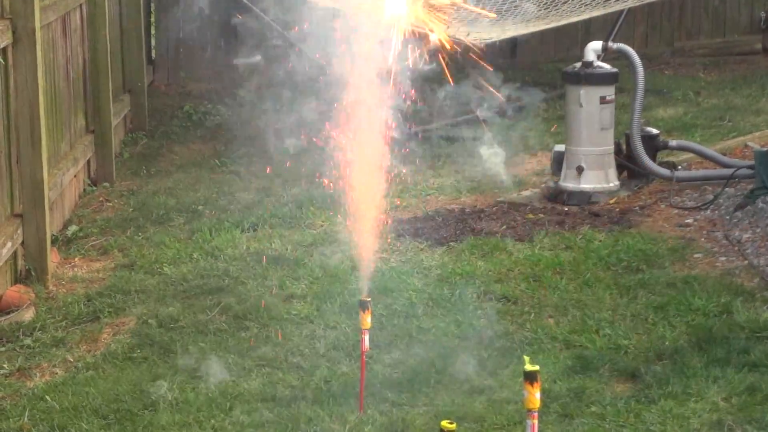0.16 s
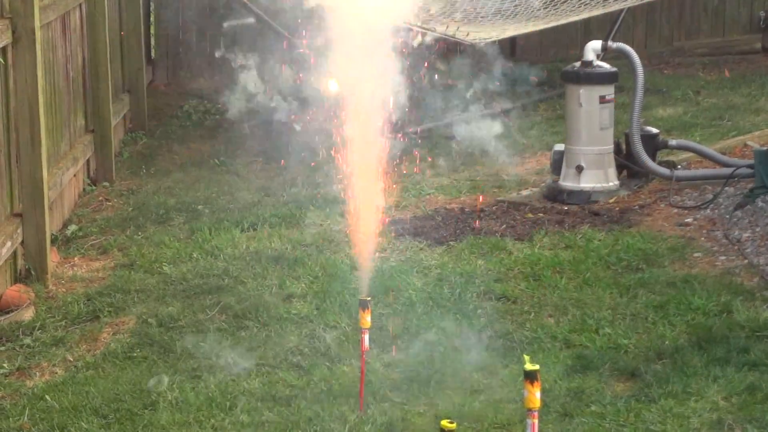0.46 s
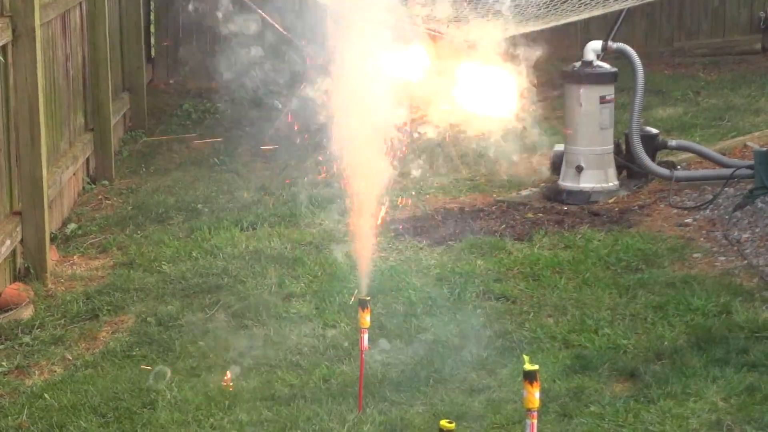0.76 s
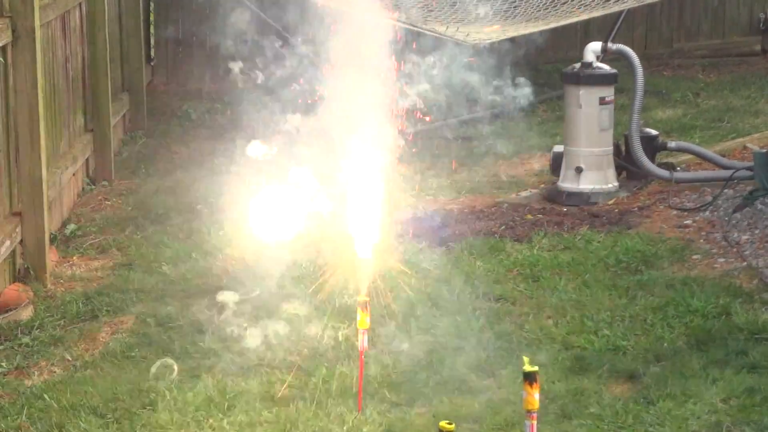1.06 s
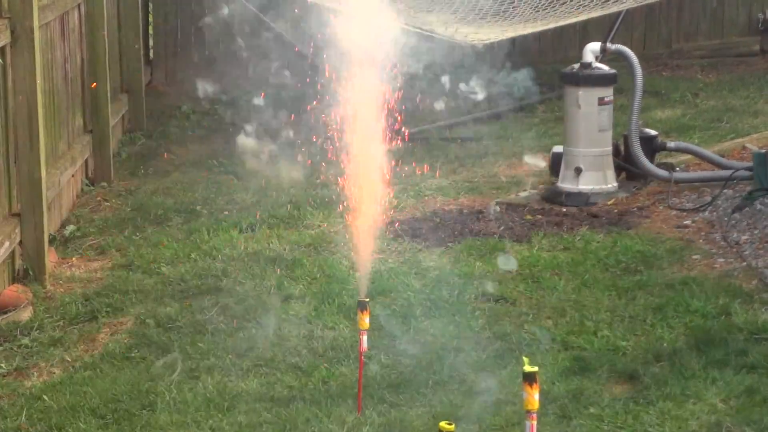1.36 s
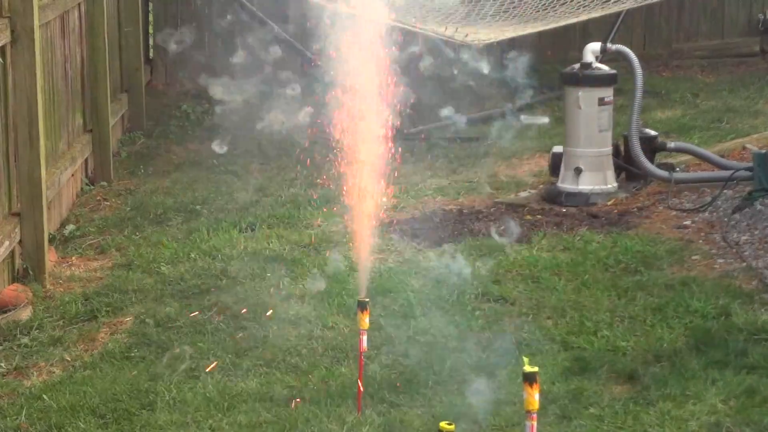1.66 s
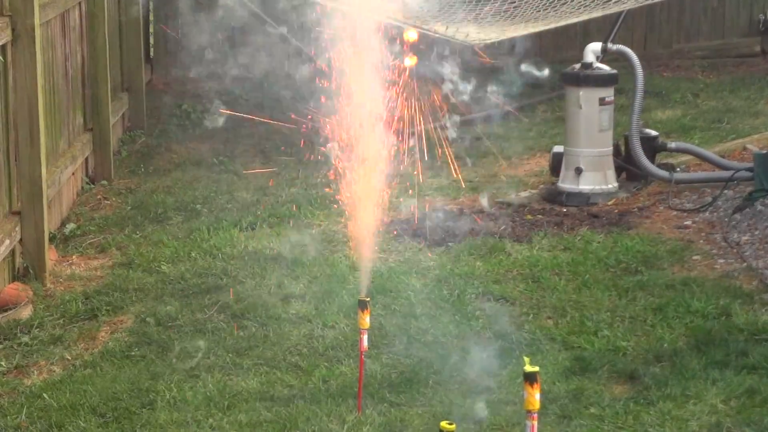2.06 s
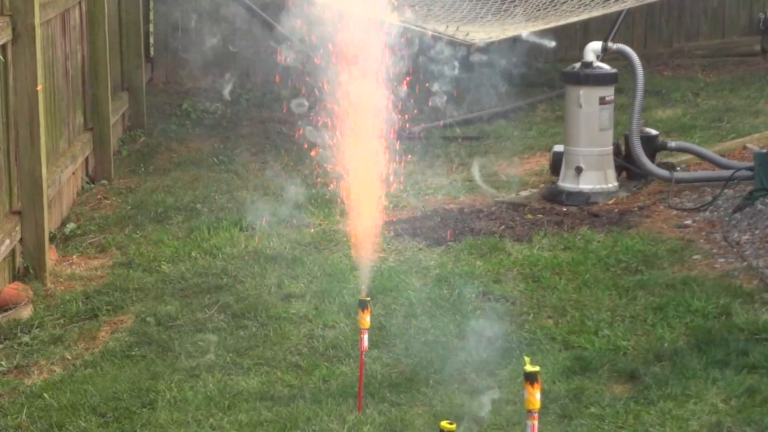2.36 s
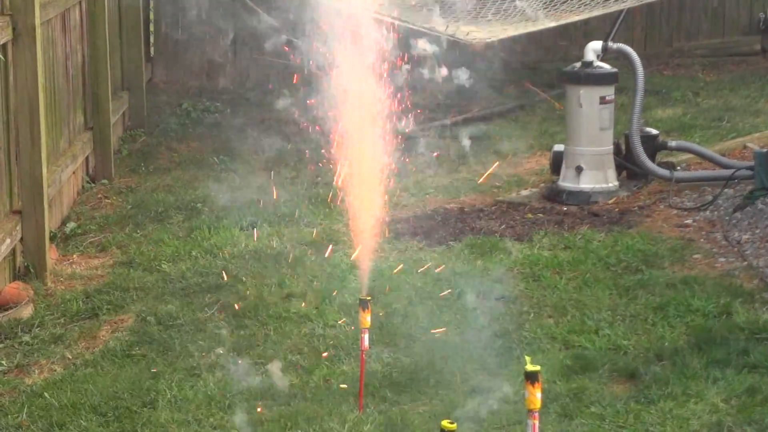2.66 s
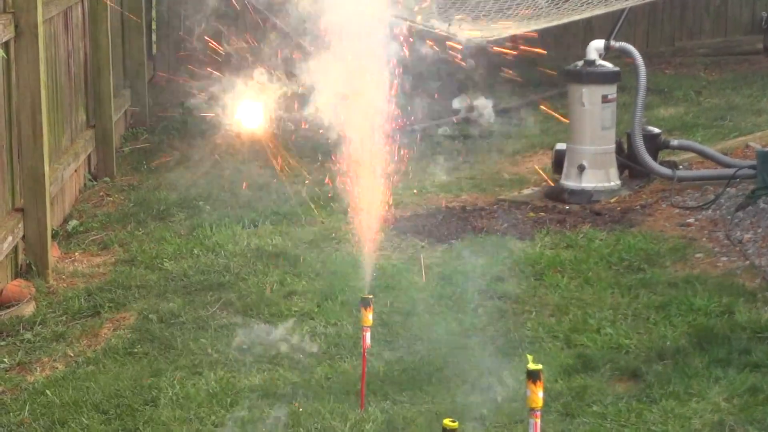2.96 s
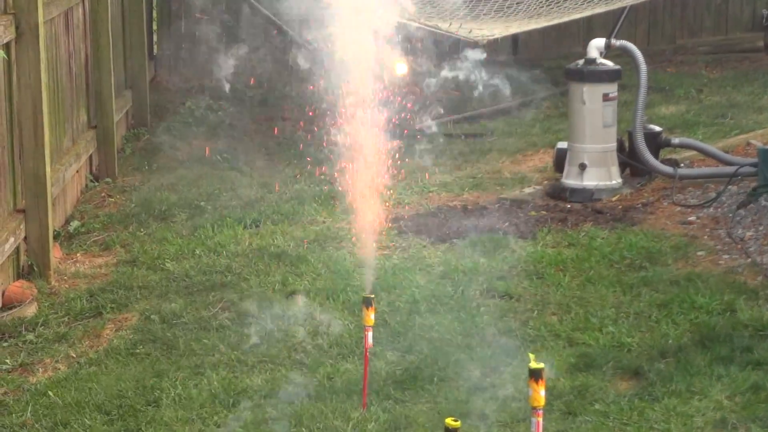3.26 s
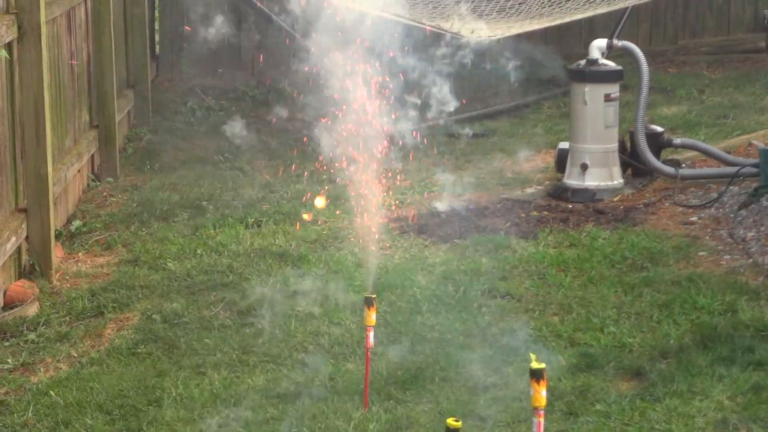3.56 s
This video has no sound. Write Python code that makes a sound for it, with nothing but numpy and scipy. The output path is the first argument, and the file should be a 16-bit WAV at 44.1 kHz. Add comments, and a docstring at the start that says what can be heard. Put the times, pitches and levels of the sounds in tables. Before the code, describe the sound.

Firework fountain already burning at full force: harsh hissing jet, hundreds of tiny snaps, louder cracks and pops scattered over it, brief dips and flares, faint low thuds; close outdoor pickup, slightly dull top and flattened peaks.

```python
"""A gas jet roars and fizzes: a ground fountain firework burns on a lawn, a few metres away.
Filtered noise makes the jet, which chokes briefly and flares again as its level curves move.
Hundreds of random spikes a second snap as sparks in the plume, with sharper cracks among them.
Now and then a larger star pops: a pressure pulse, then a short flare of noise.
Delayed copies and decaying noise echoes throw the cracks back from the ground and a wooden fence."""
import sys
import numpy as np
from scipy import signal
from scipy.io import wavfile

SR = 44100
rng = np.random.default_rng(int(sys.argv[2]) if len(sys.argv) > 2 else 0)


def store_pcm(level_fs):
    """Save levels as 16-bit WAV."""
    pcm = np.round(np.clip(level_fs, -1, 1) * 32767).astype(np.int16)
    wavfile.write(sys.argv[1], SR, np.atleast_2d(pcm).T)


N = 163170
T = np.arange(N) / SR  # seconds
EDGE_HZ = 11150  # top of the recorded band
GROUND_S, GROUND_DB = .0017, -12.5  # delay and level of the bounce off the ground
JET_WIDTH, SPARK_WIDTH = 0.24, 0.19  # side gain, for noise and for spikes


def amp(db):
    """Decibels to gain."""
    return 10 ** (np.asarray(db) / 20)


def unit(x):
    """Scales to rms 1."""
    return x / np.sqrt(np.mean(x ** 2) + 1e-20)


def add(mix, start_s, sound):
    """Mixes a sound in at a time."""
    part = mix[max(round(start_s * SR), 0):][:len(sound)]
    part += sound[:len(part)]


def spread(mid, side):
    """Left and right from middle and side."""
    return np.array([mid + side, mid - side])


def noise(width):
    """Stereo white noise with its own side signal."""
    mid, side = rng.standard_normal((2, N))
    return spread(mid, width * side)


def strength(curve):
    """A level curve read at every sample, in dB."""
    return np.interp(T, *np.transpose(curve))


def colour(x, points, size=4096):
    """Minimum-phase filter with the given spectrum and unit energy below the band edge."""
    hz = np.fft.fftfreq(size, 1 / SR)
    point_hz, point_db = np.transpose(points)
    level_db = np.interp(np.log(abs(hz) + 1), np.log(point_hz), point_db)
    # the Hilbert transform of the log gain supplies the phase that makes the filter causal
    gain = np.exp(np.conj(signal.hilbert(np.log(amp(level_db)))))
    gain /= np.sqrt(np.mean(abs(gain) ** 2 * (abs(hz) < EDGE_HZ)))
    impulse = np.fft.ifft(gain).real[None]
    return signal.oaconvolve(x, impulse, axes=1)[:, :N]


def flutter():
    """The burn surges suddenly and relaxes, at random; rms 1."""
    surges_per_s, relax_s = 140, 0.0048
    kicks = (rng.random(N) < surges_per_s / SR) * rng.uniform(0.35, 1, N)
    surges = signal.lfilter([1], [1, -np.exp(-1 / (relax_s * SR))], kicks - kicks.mean())
    return unit(surges)


def clicks(per_s, spread_db):
    """Random pressure spikes across the plume, each followed by its bounce off the ground."""
    at = np.flatnonzero(rng.random(N) < per_s / SR)
    size, place, height = rng.standard_normal((3, len(at)))
    spikes = amp(spread_db * np.minimum(size, 2)) * spread(0.95, SPARK_WIDTH * place)
    # the height of each spike varies its bounce delay
    delay = (GROUND_S * SR * np.exp(.15 * height)).astype(int)
    bounce = np.clip(at + delay, 0, N - 1)
    out = np.zeros((2, N))
    out[:, at] = spikes
    out[:, bounce] += amp(GROUND_DB) * spikes
    return out


def scatter(x, decay_s):
    """Each spike trails a brief diffuse tail of noise, scattered by the lawn."""
    keep = np.exp(-2 / (decay_s * SR))  # energy decays twice as fast as amplitude
    energy = signal.lfilter([1 - keep], [1, -keep], np.mean(x ** 2, axis=0))
    return np.sqrt(energy) * noise(JET_WIDTH)


def yard(x):
    """Short scattered echoes from the fence, different in each ear."""
    level_db, t60_s, fence_delay_s = -12, .1, .004
    t = np.arange(SR // 3) / SR
    taps = rng.standard_normal((2, len(t))) * (t > fence_delay_s) * amp(-60 * t / t60_s)
    taps /= np.linalg.norm(taps, axis=1, keepdims=True)
    return amp(level_db) * signal.oaconvolve(x, taps, axes=1)[:, :N]


# level of the bass before its trim: time_s, level_db
BASS_LEVEL = [(0.0, -72), (0.03, -80), (0.07, -64.5), (0.8, -62.5), (0.88, -81), (1.23, -69), (1.27, -70),
              (1.58, -59), (1.61, -79.5), (1.67, -52), (1.7, -60), (2.19, -85), (2.29, -54.5), (2.36, -80),
              (2.57, -75), (2.61, -95.5), (2.68, -61.5), (2.77, -70.5), (2.84, -93.5), (2.91, -71),
              (3.1, -69), (3.13, -55), (3.18, -76), (3.57, -63), (3.68, -83), (3.7, -62)]
# spectrum of the bass puffs: frequency_hz, level_db
BASS_SPECTRUM = [(15, -19), (35, -13), (70, -4), (130, 2.5), (230, 3), (400, -4), (1000, -37), (11000, -70)]


def bass():
    """Faint, irregular low puffs that come and go: random spikes filtered down to bass."""
    puffs_per_s, size_spread_db, trim_db = 67, 1, -2.5
    puffs = clicks(puffs_per_s, size_spread_db).mean(axis=0, keepdims=True)
    return unit(colour(puffs, BASS_SPECTRUM)) * amp(trim_db + strength(BASS_LEVEL))


# dull low thuds: start_s, level_db, decay_s, deep_db (gain of the deep bass part)
THUD_EVENTS = [(.087, -39, .004, -9), (0.469, -46, 0.0037, -9), (0.591, -42, .008, -9),
               (1.667, -42, 0.018, -18), (2.282, -43, 0.0034, 5), (3.128, -53, .004, -7.5),
               (3.548, -50, 0.0056, 1)]


def thuds():
    """Short, dull thuds under the hiss: decaying noise in a low band plus deep bass."""
    low_hz, top_hz = 174, 370
    band = signal.butter(2, [low_hz, top_hz], "bandpass", fs=SR, output="sos")
    low = signal.butter(2, low_hz, fs=SR, output="sos")
    out, t = np.zeros(N), np.arange(SR // 5) / SR
    for start_s, level_db, decay_s, deep_db in THUD_EVENTS:
        push = rng.standard_normal(len(t)) * np.exp(-t / decay_s)
        thud = signal.sosfilt(band, push) + amp(deep_db) * signal.sosfilt(low, push)
        even = np.sqrt(decay_s * SR / np.sum(thud ** 2))  # energy in proportion to decay
        add(out, start_s, amp(level_db) * thud * even)
    return out


# level of the low mids, 200-400 Hz, before trim and flutter: time_s, level_db
BODY_LEVEL = [(0.0, -42), (0.05, -60), (0.09, -48), (0.11, -50), (0.56, -57), (0.58, -46), (1.0, -66),
              (1.17, -48.5), (1.28, -60.5), (1.49, -46.5), (1.64, -62), (1.66, -47), (2.04, -68),
              (2.06, -63), (2.16, -59), (2.3, -51), (2.41, -82), (2.48, -56.5), (2.77, -55), (2.86, -79),
              (2.9, -61), (3.01, -56), (3.24, -60.5), (3.7, -52.5)]
# spectrum of the low mids: frequency_hz, level_db
BODY_SPECTRUM = [(30, -39), (140, -21.5), (195, -8.5), (230, 0), (290, 2.5), (370, -0.5), (450, -8.5),
                 (800, -34), (11000, -82)]


def body():
    """The low edge of the roar: filtered noise which wavers by itself."""
    trim_db, flutter_db = -1.5, 2
    level_db = trim_db + strength(BODY_LEVEL) + flutter_db * flutter()
    return colour(noise(JET_WIDTH), BODY_SPECTRUM) * amp(level_db)


# bursting stars, before filtering: start_s, level_db, push_ms (outward push of the pressure pulse),
# flare_db, flare_decay_s
POP_EVENTS = [(.0892, -1.5, .42, -30, .01), (.138, -5, .25, -18, .03), (.584, -3, .3, -23, .006),
              (1.049, -6, .3, -27, .004), (1.4495, -1.5, .45, -23, .004), (1.4585, -6, .35, -27, .004),
              (1.841, -6, .35, -23, .015), (2.223, -5, .35, -23, .012), (2.4712, -3, .2, -16, .04),
              (2.5265, -3, .25, -28, .004), (2.9975, -4, .35, -28, .004), (3.556, -6, .3, -24, .02)]
# spectrum of the roar, shared by the flares and the jet: frequency_hz, level_db
ROAR_SPECTRUM = [(30, -76), (100, -66), (170, -41), (235, -35), (290, -25), (370, -17.5), (450, -8.5),
                 (540, -4), (675, 2.5), (780, 0), (980, -2), (1220, 2.8), (1500, 0), (1850, .3),
                 (2150, -0.4), (2700, 0.5), (3800, -1.6), (6000, -7.5), (11000, -20.5)]


def pops():
    """A bursting star: a blast pulse, its ground bounce, then a short roaring flare."""
    low_hz, high_hz, bounce_db = 515, 6130, -14
    blasts, flares, t = np.zeros(N), np.zeros(N), np.arange(SR // 5) / SR
    for start_s, level_db, push_ms, flare_db, flare_decay_s in POP_EVENTS:
        u = 1000 * t / push_ms
        pulse = amp(level_db) * (1 - u) * np.exp(-u)  # a push, then a weaker suction
        add(blasts, start_s, pulse)
        add(blasts, start_s + GROUND_S, amp(bounce_db) * pulse)
        add(flares, start_s, amp(flare_db) * np.exp(-t / flare_decay_s))
    band = signal.butter(4, [low_hz, high_hz], "bandpass", fs=SR, output="sos")
    return signal.sosfilt(band, blasts) + colour(flares * noise(JET_WIDTH), ROAR_SPECTRUM)


# level of the treble fizz, which also drives the spark rate: time_s, level_db
FIZZ_LEVEL_CURVE = [(0.0, -25), (0.06, -27.5), (0.08, -32.5), (0.09, -29.5), (0.12, -26), (0.24, -30),
                    (0.33, -24), (0.41, -31), (0.43, -27), (0.45, -33.5), (0.47, -26), (0.99, -25.5),
                    (1.02, -28), (1.22, -25.5), (1.25, -27), (1.38, -23), (1.41, -27.5), (1.57, -23.5),
                    (1.61, -27), (1.65, -23.5), (1.75, -27.5), (1.78, -25), (1.91, -26), (1.95, -32),
                    (1.97, -24), (1.98, -29.5), (2.01, -22), (2.09, -28), (2.15, -24), (2.21, -27),
                    (2.35, -25.5), (2.44, -32), (2.45, -29), (2.46, -28.5), (2.53, -27.5), (2.57, -29.5),
                    (2.6, -26), (2.77, -24.5), (2.81, -27), (2.84, -21.5), (2.88, -26.5), (3.07, -23.5),
                    (3.09, -27), (3.19, -24.5), (3.51, -26), (3.57, -28), (3.6, -27), (3.7, -27)]
# sharp cracks of single stars, before filtering: start_s, level_db
CRACK_EVENTS = [(.0458, -5), (.0928, -2), (.1372, -3), (.2505, -4), (.2865, -3), (.3995, -5), (.464, -4),
                (.47, -4), (.9155, -3), (.941, -5), (1.049, -5), (1.3473, -5), (1.457, -2), (1.7395, -3),
                (1.99, -4), (2.0963, -5), (2.3903, -5), (2.4503, -2), (2.4711, -3), (2.591, -5),
                (2.9043, -5), (3.1303, -4), (3.2974, -4), (3.4524, -5)]
# spectrum of the snaps and cracks: frequency_hz, level_db
SNAP_SPECTRUM = [(30, -70), (100, -50), (170, -35), (250, -32), (370, -15.5), (500, -3.5), (680, -4),
                 (1000, 1), (1300, 0), (2000, 3.5), (3500, 5.5), (6000, 3.5), (11000, 1.5)]


def sparks():
    """Tiny shock waves, denser when the fizz is strong, and a few loud cracks."""
    sparks_per_s, spark_db, size_spread_db = 220, -4.5, 2.5
    scatter_db, scatter_decay_s = -8.5, 0.00078
    level_db = strength(FIZZ_LEVEL_CURVE)
    # the rate follows the power of the fizz and equals sparks_per_s at its median level
    rate = sparks_per_s * amp(2 * (level_db - np.median(level_db)))
    snaps = amp(spark_db) * clicks(rate, size_spread_db)
    cracks = np.zeros(N)
    for start_s, crack_db in CRACK_EVENTS:
        add(cracks, start_s, amp([crack_db]))
        add(cracks, start_s + GROUND_S, amp([crack_db + GROUND_DB]))
    spikes = snaps + cracks
    return colour(spikes + amp(scatter_db) * scatter(spikes, scatter_decay_s), SNAP_SPECTRUM)


# level of the jet's roar before its trim: time_s, level_db
ROAR_LEVEL_CURVE = [(0, -23.5), (.06, -32), (.085, -39), (.1, -21.5), (.12, -23), (.18, -23.5), (.21, -23),
                    (.24, -26.5), (.33, -21), (.41, -22), (.48, -22.5), (.55, -23), (.67, -23), (.8, -25),
                    (.98, -25), (1.02, -27), (1.16, -21), (1.25, -24), (1.29, -22), (1.33, -25.5),
                    (1.37, -22), (1.44, -28), (1.47, -25), (1.54, -22), (1.61, -24), (1.66, -22),
                    (1.7, -27.5), (1.79, -24), (1.9, -24.5), (1.95, -31), (1.98, -27.5), (2.01, -22.5),
                    (2.07, -25.5), (2.2, -24), (2.26, -23.5), (2.35, -28.5), (2.44, -35.5), (2.466, -31),
                    (2.5, -27.5), (2.58, -23.5), (2.6, -21.5), (2.82, -26), (3.0, -20), (3.06, -24.5),
                    (3.1, -28.5), (3.22, -23.5), (3.47, -23), (3.54, -24), (3.57, -22.5), (3.7, -26.5)]
# spectrum of the fizz: frequency_hz, level_db
FIZZ_SPECTRUM = [(30, -70), (100, -59), (200, -48), (400, -33.5), (700, -10), (2000, -8.5), (3500, -1),
                 (4400, -0.5), (5200, 0), (7000, -0.5), (9000, 0.5), (11000, -1.5)]


def jet():
    """Turbulent gas roars and spits at the nozzle; burning powder fizzes above it."""
    roar_trim_db, roar_flutter_db, fizz_flutter_db = -1, 1, 0.8
    spits_per_s, spit_db, spit_spread_db = 230, -2, 3
    tail_db, tail_decay_s = -2.5, 0.0014
    gas = noise(JET_WIDTH) * amp(roar_flutter_db * flutter())
    spits = unit(clicks(spits_per_s, spit_spread_db))
    spits = amp(spit_db) * (spits + amp(tail_db) * scatter(spits, tail_decay_s))
    roar = colour(unit(gas + spits), ROAR_SPECTRUM)
    roar *= amp(roar_trim_db + strength(ROAR_LEVEL_CURVE))
    fizz = colour(noise(JET_WIDTH), FIZZ_SPECTRUM)
    fizz *= amp(strength(FIZZ_LEVEL_CURVE) + fizz_flutter_db * flutter())
    return roar + fizz


def scene():
    """The jet, its crackle and the echoes of the yard."""
    crackle = sparks() + pops()
    return yard(crackle) + bass() + thuds() + body() + crackle + jet()


def record(dry):
    """A narrow-band recorder that rounds off the tallest spikes."""
    ceiling = .52  # full scale is 1
    edge = signal.firwin(511, EDGE_HZ, window=("kaiser", 9), fs=SR)[None]
    x = signal.oaconvolve(dry, edge, "same", axes=1)
    excess = x / (1 + (x / ceiling) ** 4) ** (1 / 4) - x
    # only the part of the rounding above 500 Hz is applied
    highpass = signal.butter(3, 500, "highpass", fs=SR, output="sos")
    x = x + signal.sosfilt(highpass, excess)
    return signal.oaconvolve(x, edge, "same", axes=1)


dry = scene()
out = record(dry)
store_pcm(out)
```